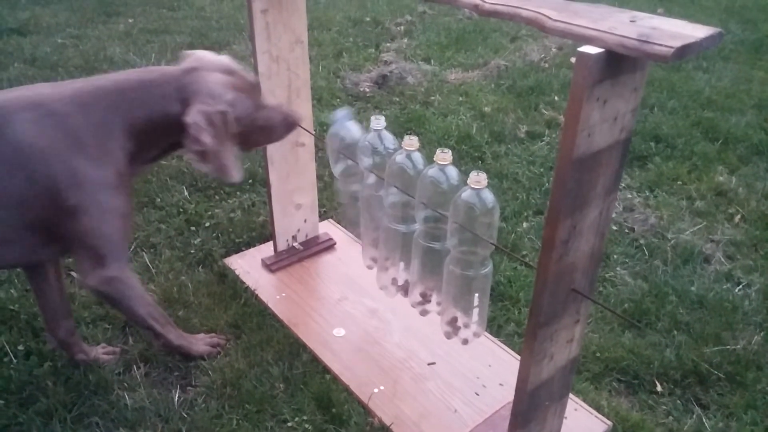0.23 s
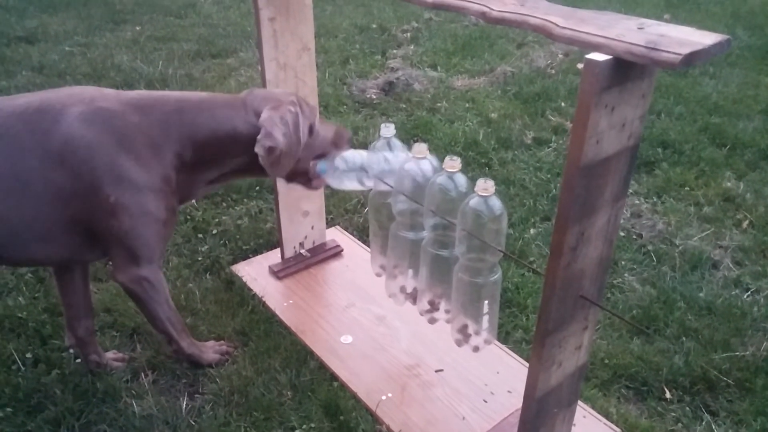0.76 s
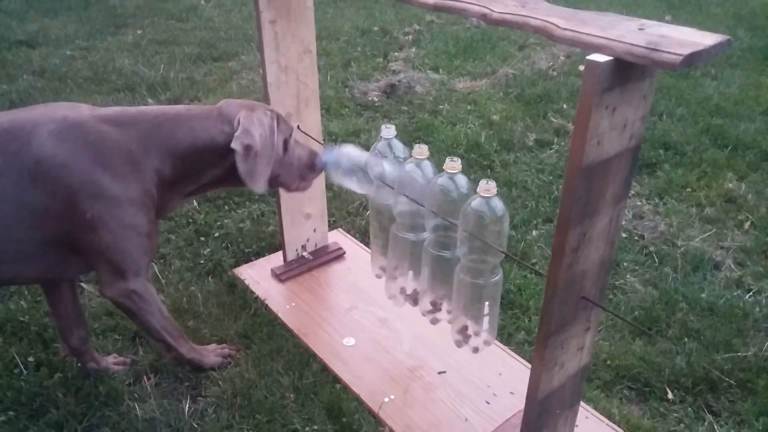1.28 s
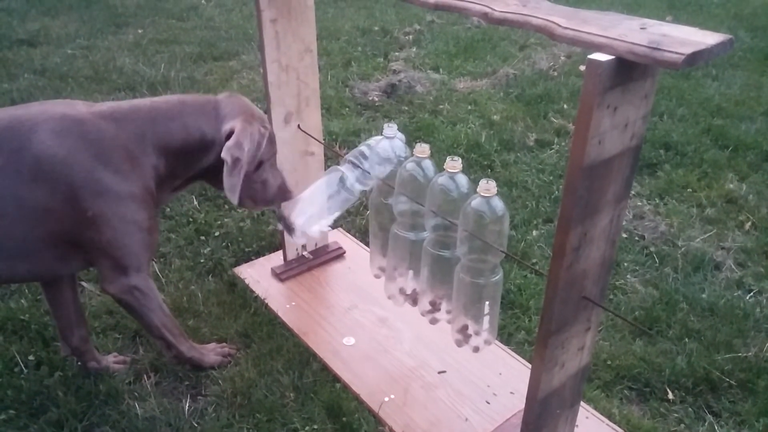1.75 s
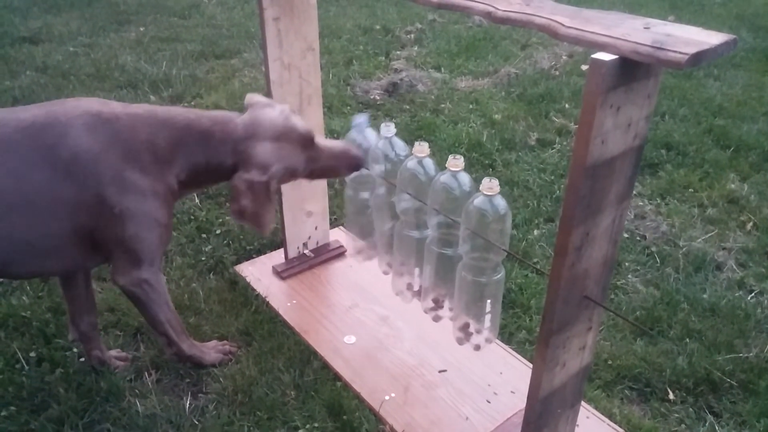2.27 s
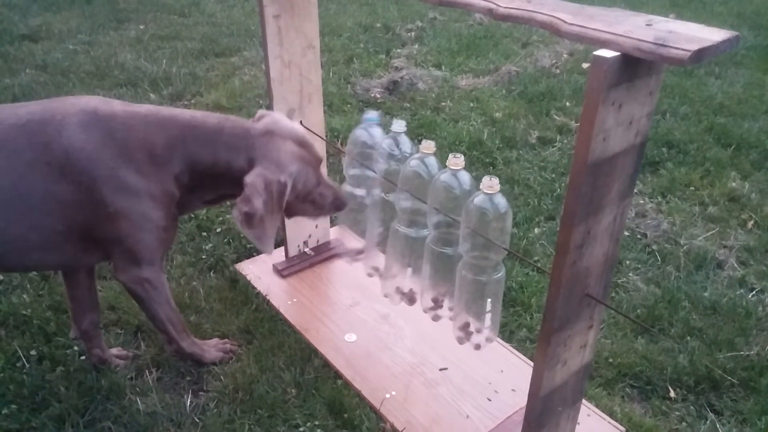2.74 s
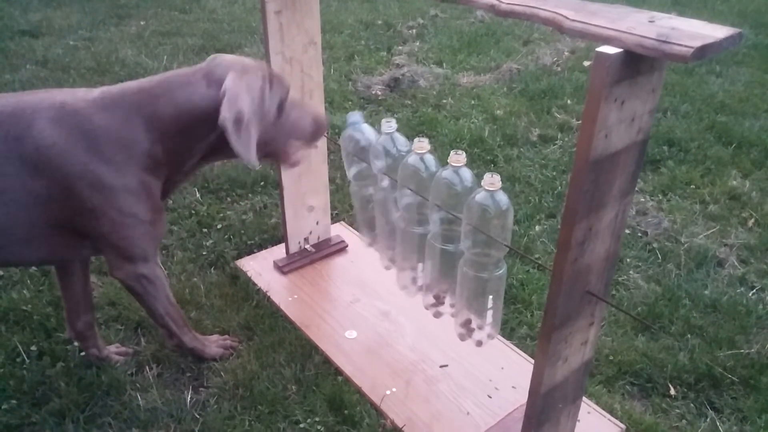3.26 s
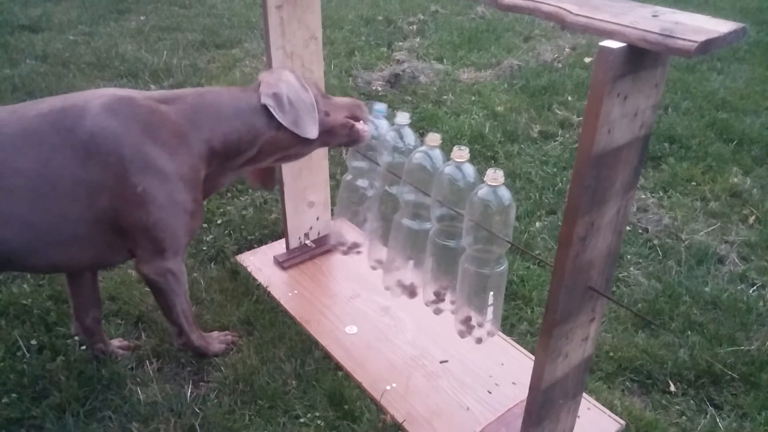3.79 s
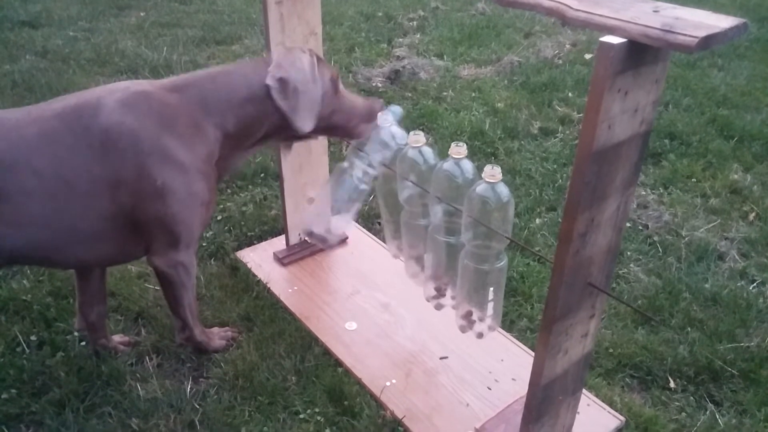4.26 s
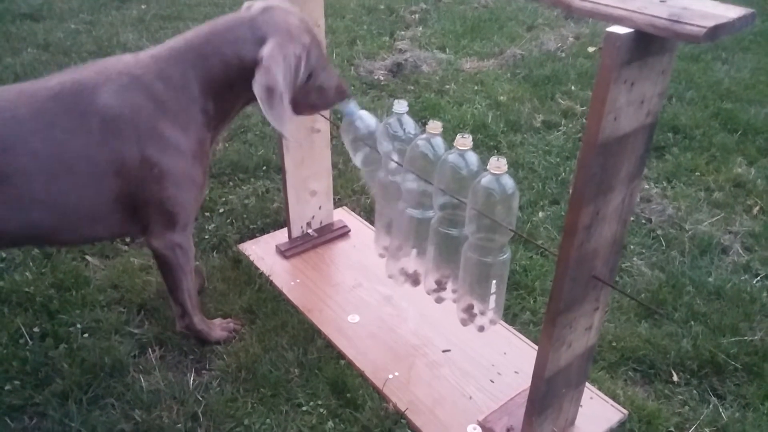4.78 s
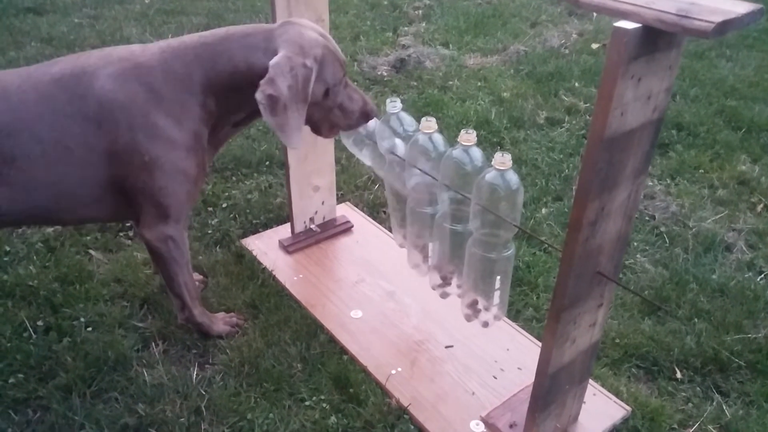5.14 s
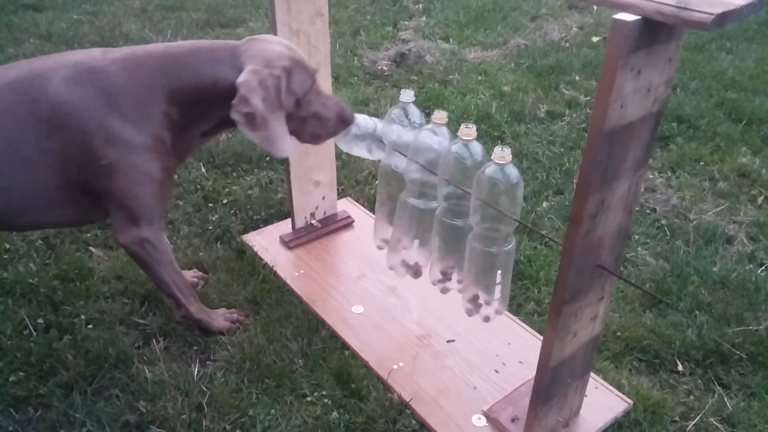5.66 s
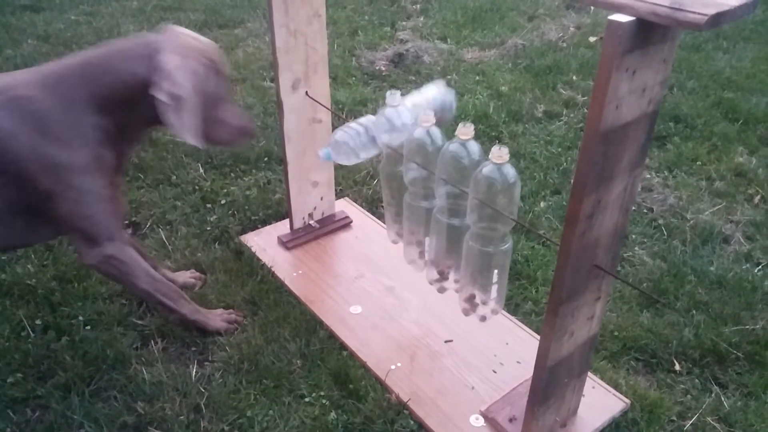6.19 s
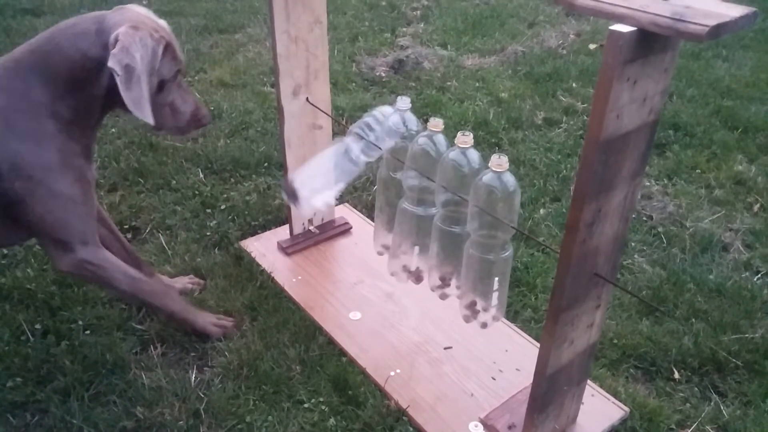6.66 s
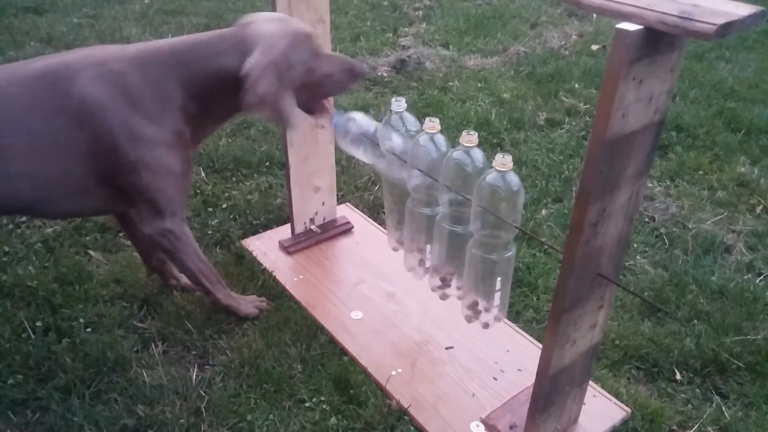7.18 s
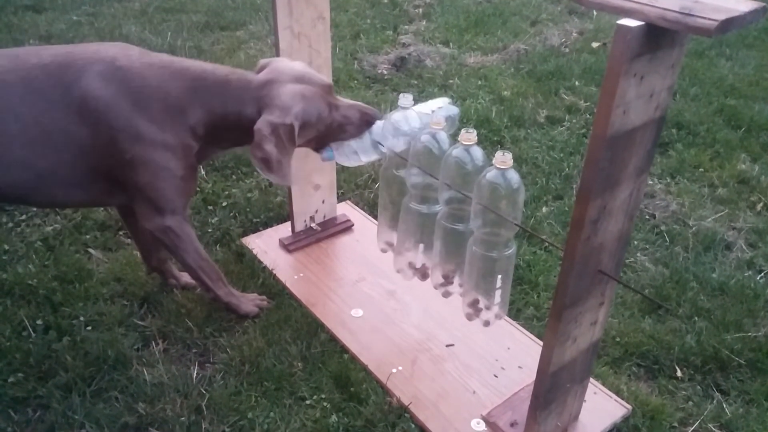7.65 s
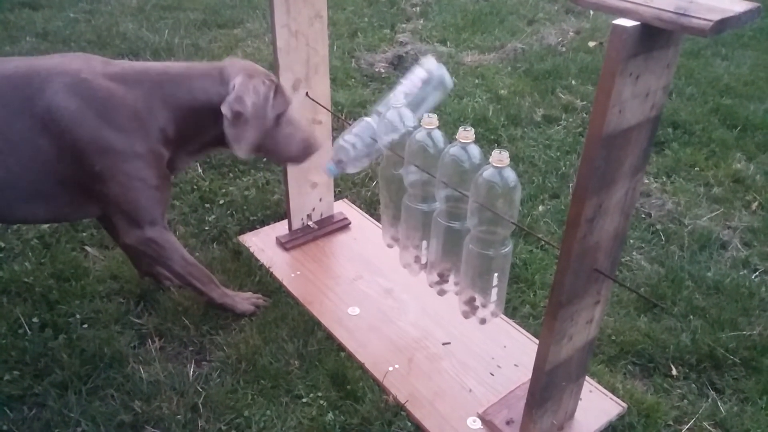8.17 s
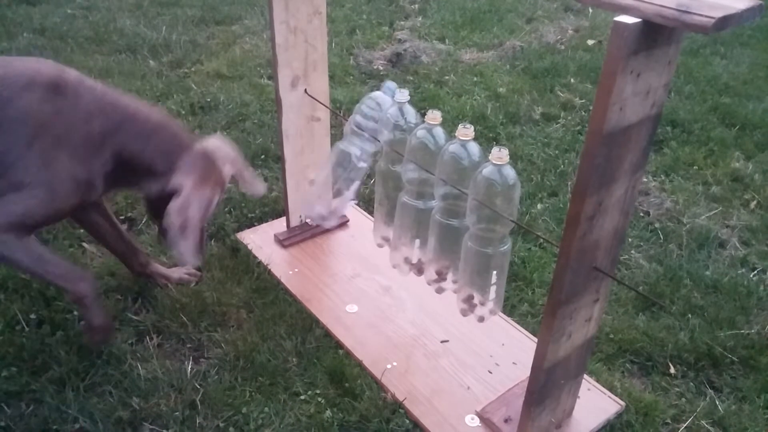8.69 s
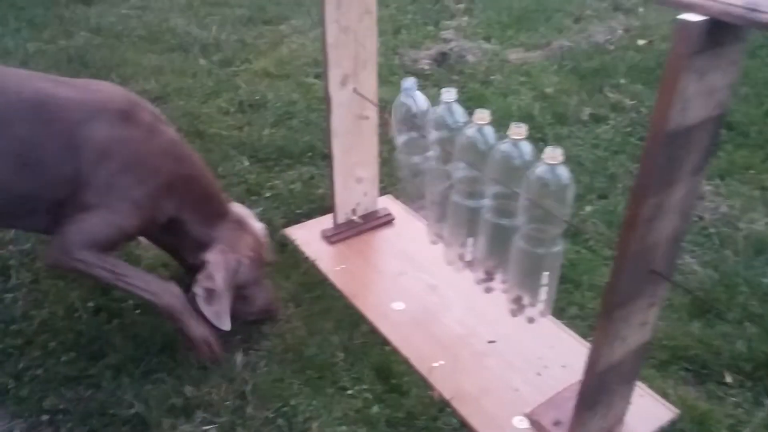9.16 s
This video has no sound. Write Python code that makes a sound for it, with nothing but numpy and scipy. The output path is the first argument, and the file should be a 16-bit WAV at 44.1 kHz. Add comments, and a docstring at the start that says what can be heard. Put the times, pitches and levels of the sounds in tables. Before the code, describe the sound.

A dog nudges thin plastic bottles hanging on a wire, and they knock together with hollow, crackly taps. Dry treats tumble and rattle inside with each swing. The knocks come in uneven clusters with brief lulls, and the loudest clatter arrives near the end before dying away. The bottles sound clear and near in a garden, with only a very faint rumble of distant traffic underneath.

```python
"""Thin plastic bottles, hung on a wire in a wooden frame in a garden, knock as a dog nudges them.
Each impact, on another bottle or on the snout, excites damped wall and air modes and a noisy crack.
Dry treats tumble inside and excite the same modes with many small impacts; far traffic rumbles.
A downward expander attenuates the quiet moments and opens again with the knocks."""
import sys
import numpy as np
from scipy import signal
from scipy.fft import rfft, irfft
from scipy.io import wavfile
from scipy.ndimage import uniform_filter1d

SR = 44100
rng = np.random.default_rng(int(sys.argv[2]) if len(sys.argv) > 2 else 0)


def wav_record(signal):
    """Record a signal, one row per channel, as 16-bit PCM in the file named by sys.argv[1]."""
    frames = np.transpose(np.atleast_2d(signal))
    bounded = np.clip(frames, -1, 1)
    # unit amplitude maps onto the largest positive 16-bit level
    quanta = np.round(bounded * 32767).astype(np.int16)
    wavfile.write(sys.argv[1], SR, quanta)


N = 415862

# impacts: (time [s], level [dB], low body [dB re middle], high crack [dB re middle], favoured ring [Hz])
KNOCKS = [(0.043, -25.5, -10.5, -34.5, 650), (0.078, -12.5, -32, -15, 2160), (0.125, -6, -31.5, -22, 2600),
          (0.207, -16.5, -14, -23, 1440), (0.278, -11.5, -43.5, -28, 1260),
          (0.49, -29.5, -14.5, -14.5, 2410), (0.592, -20.5, 0.5, -15.5, 896), (0.689, -18, -12, -39, 1340),
          (0.718, -19, -1.5, -25, 203), (0.743, -23.5, -2.5, -25.5, 1260), (0.781, -14, -1.5, -20.5, 630),
          (0.858, -14, -4.5, -16.5, 1580), (0.89, -13.5, -6.5, -6, 646), (0.918, -15.5, -2.5, -9.5, 2200),
          (0.955, -18.5, 0.5, -12, 686), (1.078, -34.5, -41, -2, 2470), (1.339, -7.5, -10, -16.5, 1073),
          (1.429, -8.5, -6, -13.5, 430), (1.789, -13, -13, -36.5, 2350), (1.84, -15, -20, -28.5, 1330),
          (2.033, -17, -11.5, -21.5, 454), (2.102, -11.5, -10, -10.5, 1080), (2.219, -19.5, -7, -8.5, 1380),
          (2.271, -7, -5, -22, 677), (2.355, -18, -15.5, -19, 2160), (2.443, -24.5, 1.5, -18, 528),
          (2.552, -28.5, 3, -73, 940), (2.61, -17.5, -1.5, -45.5, 894), (2.733, -30, -1, -62, 570),
          (2.779, -21, -5.5, -12.5, 552), (3.049, -32, 2, -62, 974), (3.425, -33.5, -2.5, -11.5, 444),
          (3.575, -35.5, 5, -56, 522), (3.756, -25.5, -0.5, -19.5, 560), (3.809, -11, -7.5, -10, 560),
          (3.826, -7, -24, -8.5, 540), (3.866, -8, -7.5, -14, 484), (4.132, -17.5, -2.5, -14.5, 710),
          (4.191, -16, -15, -16.5, 605), (4.28, -15, -13.5, -18, 430), (4.312, -19.5, 0.5, -14.5, 2170),
          (4.418, -26, -29, -47, 1360), (4.616, -11, -3, -13.5, 540), (4.786, -25.5, 1, -24.5, 450),
          (4.864, -29, -2.5, -26, 620), (5.086, -9.5, -1.5, -28.5, 1190), (5.104, -12, -6.5, -10, 636),
          (5.146, -11, -46, -34, 1336), (5.181, -12.5, -7.5, -18, 635), (5.269, -16.5, -4.5, -20.5, 1280),
          (5.33, -37.5, -41.5, -5.5, 1440), (5.372, -11, -8, -5, 600), (5.426, -20.5, -0.5, 2, 1260),
          (5.453, -15.5, -2.5, -7, 331), (5.511, -14.5, -11.5, -13.5, 1290), (5.749, -19, -1.5, -25.5, 519),
          (5.795, -12.5, -7, -0.5, 1300), (5.858, -17, -4, 0, 510), (5.883, -6, -23.5, -11, 1380),
          (5.922, -24.5, -11, 0, 608), (5.994, -22, 0, -4.5, 1240), (6.046, -22.5, -1.5, -47, 568),
          (6.261, -32.5, -2.5, -49, 538), (6.367, -12.5, -22, -23, 1440), (6.393, -10.5, -12, -30, 1400),
          (6.459, -10, -13, -25, 2540), (6.89, -12.5, -14, -25.5, 1135), (6.938, -10.5, -25, -24, 2180),
          (7, -16.5, -45, -19.5, 2260), (7.287, -23, -23.5, -15.5, 1000), (7.466, -12, -6, -20, 1360),
          (7.53, -14.5, -1, -13.5, 1315), (7.682, -6, -3, -9.5, 1140), (7.796, -25.5, -2, -27, 600),
          (8.083, -5, -10.5, -30, 2780), (8.162, -13.5, -2.5, -24.5, 435), (8.195, -6.5, -37.5, -36, 1560),
          (8.21, -11.5, -3, -22.5, 360), (8.261, -8.5, -3.5, -27, 1520), (8.31, -14, -9.5, -24.5, 363),
          (8.556, -27.5, 3, -23, 940), (8.641, -12.5, -2, -30, 535), (8.659, -3.5, 0.5, -25, 930),
          (8.737, -2.5, -11, -21, 1310), (8.753, -2.5, -14.5, -16, 1430), (8.793, -7, -29, -21.5, 1380),
          (8.873, -5.5, -35, -18, 2180), (8.901, -10, -22, -22.5, 870), (9.096, -20, -46, -36.5, 1450),
          (9.222, -26, -16.5, -22.5, 1080)]
# level difference between the channels: (frequency [Hz], left minus right [dB])
LEFT_LOUDER = [(60, 4.5), (180, 4), (550, 5), (1650, 1), (4970, -2), (15000, 1.5)]
MODE_SHARE_DB = -14.5   # one mode's share of an impact's level


def knocks():
    """Impact excitation: single blows on a bottle set its wall and the enclosed air vibrating."""
    time_s, level_db, body_db, crack_db, ring_hz = np.transpose(KNOCKS)
    colour = (body_db, crack_db, ring_hz, 13.0)
    return bottle_impacts(time_s, level_db + MODE_SHARE_DB, colour,
                          scatter_db=2.5, contact_s=.004, noise_db=9.0, crack_t60=0.043)


def bottle_impacts(time_s, level_db, colour, scatter_db, contact_s, noise_db, crack_t60):
    """Radiation efficiency: a small bottle radiates its ring and crack, but no deep bass."""
    onsets = (time_s * SR).astype(int)
    ring = bottle_ring(onsets, level_db, colour, scatter_db, contact_s)
    crack = wall_crack(onsets, level_db + noise_db, colour, scatter_db, contact_s, crack_t60)
    return signal.sosfilt(signal.butter(2, 145, "high", fs=SR, output="sos"), ring + crack)


def bottle_ring(onsets, level_db, colour, scatter_db, contact_s):
    """Modal superposition: each mode is a damped resonator, driven with a new strength by every blow."""
    # wall and air modes: (frequency [Hz], relative level [dB], decay time T60 [s])
    modes = [(202.4, -3.5, 0.12), (352.3, -6.5, 0.13), (426.4, -4, 0.11), (488, 1.5, 0.062),
             (567.5, 1, 0.072), (636, -6, 0.19), (876, -1, 0.038), (968.7, -2, 0.058), (1078, -9.5, 0.04),
             (1243, 3, 0.027), (1332, -3.5, 0.059), (1474, -1.5, 0.041), (1857, -6, 0.055),
             (2172, 0.5, 0.032), (2475, -7, 0.059), (2686, -3.5, 0.043), (3290, -10.5, 0.036),
             (6370, 8, 0.021)]
    out = np.zeros((2, N))
    for hz, mode_db, t60 in modes:
        strength, lobe, delay, polarity = rng.standard_normal((len(onsets), 4)).T
        # higher modes radiate in lobes, so the two channels receive them differently
        lobes_db = np.clip(hz / 1000, 0, 3.5) * lobe * [[1], [-1]]
        size = amp(level_db + mode_db + colour_db(hz, *colour) + scatter_db * strength + lobes_db)
        # the wall buckles during the contact, so the modes do not start together
        starts = onsets + (contact_s * SR * np.abs(delay)).astype(int)
        drive = impulses(starts, size * np.sign(polarity))
        radius, angle = amp(-60 / (t60 * SR)), 2 * np.pi * hz / SR
        ring = signal.lfilter([.5, 0, -.5], [1, -2 * radius * np.cos(angle), radius ** 2], drive)
        out += ring * stereo_gain(hz)
    return out


def wall_crack(onsets, level_db, colour, scatter_db, contact_s, crack_t60):
    """Frequency-dependent damping: the thin wall gives a noise burst whose higher bands die sooner."""
    # crack spectrum: (frequency [Hz], relative level [dB])
    spectrum = [(250, -20.5), (600, -9.5), (1300, -15.5), (2500, -4), (4500, 7.5), (6500, 7), (9000, -8.5),
                (15000, 1)]
    edges_hz = 200 * 2 ** np.arange(0, 6.6, .5)
    swell_s = 2.38 * contact_s   # the crinkle builds over the contact
    shared, own = rng.standard_normal((2, 2, N))
    out = np.zeros((2, N))
    for k, (low, high) in enumerate(zip(edges_hz, edges_hz[1:])):
        hz = np.sqrt(low * high)
        band_db = level_db + at_hz(spectrum, hz) + colour_db(hz, *colour[:3], favour_db=0)
        size = amp(band_db + scatter_db * rng.standard_normal(len(onsets)))
        energy = impulses(onsets, [size ** 2])[0]
        burst = decay(decay(energy, swell_s), swell_s) * np.log(1000) / (swell_s * SR)
        t60 = crack_t60 * (1000 / hz) ** 0.11
        power = decay(burst, t60) + 0.13 * decay(burst, 3.5 * t60)   # a snap, then a faint tail
        noise = shared[k % 2] + np.clip(hz / 6000, 0, .7) * own[::(-1) ** k]   # wider in the treble
        band = signal.butter(2, [low, high], "band", fs=SR, output="sos")
        gain = stereo_gain(hz) / np.sqrt(2 * (high - low) * contact_s)
        out += gain * signal.sosfilt(band, noise * np.sqrt(power))
    return out


def colour_db(hz, body_db, crack_db, ring_hz, favour_db):
    """Point of excitation: where a blow lands weights bass and treble and favours modes near one pitch."""
    low = np.clip(np.log(900 / hz) / np.log(1.55), 0, 1.8)
    high = np.clip(np.log(hz / 2500) / np.log(1.7), 0, 1)
    # soft snout blows lose the middle too
    muffled_db = np.minimum(crack_db + 34.5, 0) * np.clip(np.log2(hz / 1200), 0, 1)
    favoured = np.exp(-(np.log(hz / ring_hz) / 0.091) ** 2)
    return low * body_db + high * crack_db + muffled_db + favour_db * favoured


def treats():
    """Granular impacts: dense random ticks and a few clear clicks drive the bottle wall from inside."""
    # single treats striking the wall: (time [s], level [dB])
    clicks = [(1.287, -35.5), (1.318, -22.5), (1.87, -13.5), (2.416, -22.5), (5.204, -12.5), (6.304, -33.5),
              (6.338, -26), (6.486, -29), (6.527, -22.5), (6.83, -36), (7.156, -22), (7.356, -37),
              (7.394, -29.5), (8.128, -25), (8.288, -12), (8.384, -22.5), (8.54, -24), (8.769, -3),
              (8.991, -13.5), (9.033, -16.5), (9.064, -22), (9.131, -25)]
    click_s, click_db = np.transpose(clicks)
    ticks_per_s, smallest_tick_db, hollow_hz = 400, -20, 519
    position, chance = rng.random((round(ticks_per_s * N / SR), 2)).T
    tick_s = position * N / SR
    excess_db = 3.82 * np.minimum(-np.log(chance + 1e-9), 3.3)   # many small ticks, few large
    tick_db = tumbling_db(tick_s) + smallest_tick_db + excess_db
    time_s = np.concatenate([tick_s, click_s])
    level_db = np.concatenate([tick_db, click_db + MODE_SHARE_DB])
    # each takes some colour from the nearest knock; about half land in the hollow base
    blows = np.array(KNOCKS)
    nearest = np.searchsorted((blows[1:, 0] + blows[:-1, 0]) / 2, time_s)
    body_db, crack_db, knock_hz = blows[nearest, 2:].T
    ring_hz = np.where(rng.random(len(time_s)) < .5, hollow_hz, knock_hz)
    colour = (0.34 * body_db + 0.73, 0.68 * crack_db, ring_hz, 9.0)
    return bottle_impacts(time_s, level_db, colour,
                          scatter_db=6.0, contact_s=.0008, noise_db=2.0, crack_t60=0.024)


def tumbling_db(time_s):
    """Exponential growth and decay: treats tumble with each swing; the loudest tumble sets the level."""
    # tumbles: (peak time [s], level [dB], build-up [s], settling [s])
    tumbles = [(0.121, -18.5, 0.059, 0.19), (0.51, -36.5, 0.045, 0.39), (0.88, -29.5, 0.62, 0.29),
               (1.401, -33, 0.35, 0.45), (1.813, -28.5, 0.079, 0.31), (2.049, -21, 0.047, 0.19),
               (2.329, -29.5, 0.38, 0.22), (2.62, -46.5, 0.23, .17), (2.801, -38.5, 0.16, 0.32),
               (3.591, -51, 0.028, 0.17), (3.822, -26, 0.071, 0.34), (4.186, -22, 0.11, 0.19),
               (4.626, -32, 0.23, 0.25), (5.11, -22.5, 0.049, 0.43), (5.491, -28.5, 0.43, 0.11),
               (5.759, -23.5, 0.031, 0.33), (5.877, -13, 0.11, 0.11), (6.39, -30.5, 0.15, 0.45),
               (6.929, -29.5, 0.1, 0.49), (7.28, -40.5, 0.037, 1), (7.91, -38, 1, 0.063),
               (7.975, -38, .01, .9), (8.309, -26.5, 0.6, 0.26), (8.5, -42, 0.44, 0.52),
               (8.758, -16, 0.25, 0.46)]
    swell_db = 30   # gained over the build-up, lost over the settling
    peak_s, level_db, build_s, settle_s = np.transpose(tumbles)[:, :, None]
    from_peak = np.maximum((peak_s - time_s) / build_s, (time_s - peak_s) / settle_s)
    return np.max(level_db - swell_db * from_peak, axis=0)


def traffic_rumble():
    """Spectrally shaped noise: far traffic and air, mostly bass and nearly coherent in both channels."""
    # rumble spectrum: (frequency [Hz], relative spectral density [dB])
    spectrum = [(25, -36), (58, -3.5), (100, -3.5), (250, -14.5), (600, -15), (1200, -28.5), (4000, -35.5),
                (15000, -42)]
    # slow drift of the rumble: (time [s], level [dB])
    levels = [(0, -47), (5, -49), (6.5, -46), (7.198, -45), (9.43, -46)]
    white = rng.standard_normal((3, N))
    hz = np.maximum(np.arange(N // 2 + 1) * SR / N, 1)
    rumble = irfft(rfft(white[0] + .2 * white[1:]) * amp(at_hz(spectrum, hz)) * stereo_gain(hz), N)
    envelope = amp(np.interp(np.arange(N) / SR, *np.transpose(levels)))
    return envelope * rumble / rumble.std()


def amp(db):
    """Decibel law: 20 dB is a factor of ten in amplitude."""
    return 10 ** (np.asarray(db) / 20)


def at_hz(points, hz):
    """Interpolation of a spectrum on a logarithmic frequency axis."""
    frequencies, levels_db = np.transpose(points)
    return np.interp(np.log(hz), np.log(frequencies), levels_db)


def stereo_gain(hz):
    """Interchannel level difference, split evenly between left and right."""
    return amp(at_hz(LEFT_LOUDER, hz) / 2 * np.array([[1], [-1]]))


def impulses(onsets, sizes):
    """Impulse train from sample positions and sizes (channels x events)."""
    return np.array([np.bincount(onsets, side, N)[:N] for side in sizes]) + 1e-18


def decay(x, t60):
    """Exponential decay: each impulse falls to a thousandth in t60 seconds."""
    return signal.lfilter([1], [1, -amp(-60 / (t60 * SR))], x)


def scene():
    """Superposition of bottles, treats and traffic; a longer path delays the right channel."""
    left, right = knocks() + treats() + traffic_rumble()
    lag_samples = 4
    return np.array([left, np.pad(right, (lag_samples, 0))[:N]])


def expander(x, threshold_db, slope, depth_db, release_db_per_s, attack_s):
    """Downward expansion: gain falls steeply below a threshold, quick to open and slower to close."""
    sensed = signal.lfilter(*signal.butter(1, 120, "high", fs=SR), x)   # less sensitive to bass
    level_db = 10 * np.log10(uniform_filter1d(np.mean(sensed ** 2, 0), size=200) + 1e-14)
    fall_db = release_db_per_s * np.arange(N) / SR
    held_db = np.maximum.accumulate(level_db + fall_db) - fall_db
    gain_db = np.clip(slope * (held_db - threshold_db), -depth_db, 0)
    pole = np.exp(-1 / (attack_s * SR))
    return x * amp(signal.lfilter([1 - pole], [1, -pole], gain_db + depth_db) - depth_db)


def record(dry):
    """Transduction: band-limited microphone, preamplifier hiss, expander, soft saturation, treble cut."""
    x = signal.sosfilt(signal.butter(4, [45, 7200], "band", fs=SR, output="sos"), dry)
    hiss = amp(-56) * signal.lfilter(*signal.butter(1, 6000, fs=SR), rng.standard_normal((2, N)))
    x = expander(x + hiss, threshold_db=-38, slope=2.43, depth_db=27,
                 release_db_per_s=190.5, attack_s=0.001)
    saturated = x / (1 + x ** 6) ** (1 / 6)
    return signal.sosfilt(signal.cheby2(12, 70, 15850, fs=SR, output="sos"), saturated)


dry = scene()
out = record(dry)
wav_record(out)
```